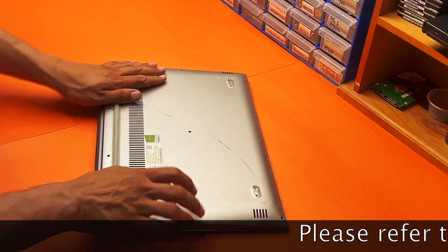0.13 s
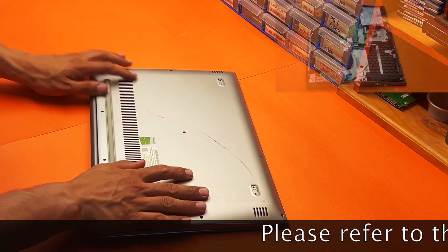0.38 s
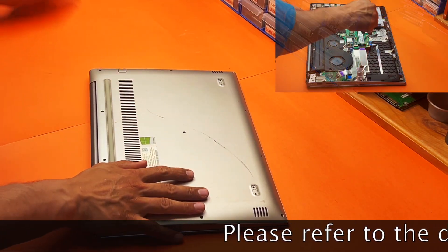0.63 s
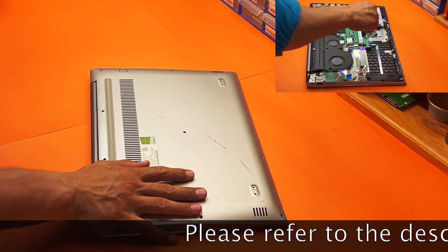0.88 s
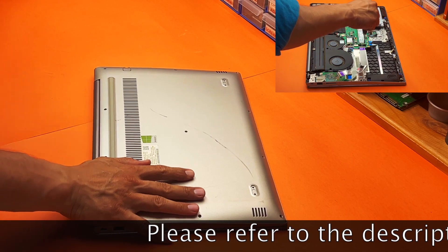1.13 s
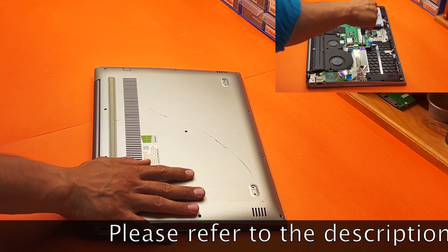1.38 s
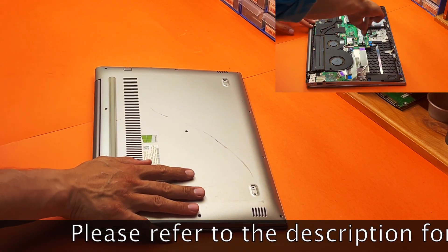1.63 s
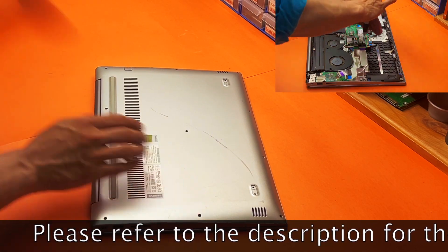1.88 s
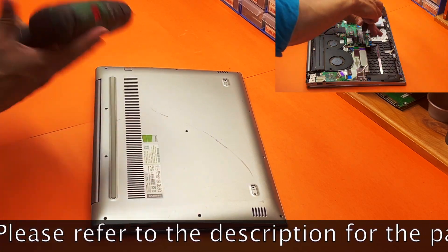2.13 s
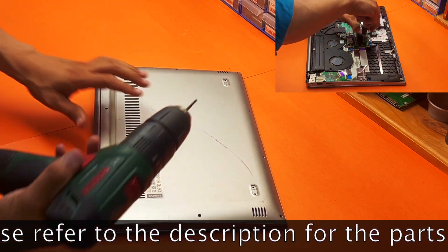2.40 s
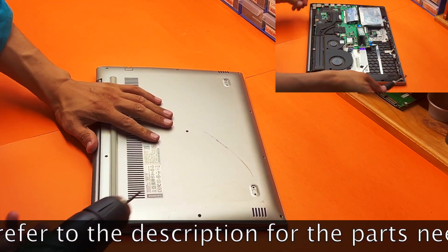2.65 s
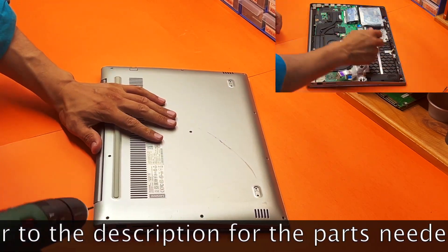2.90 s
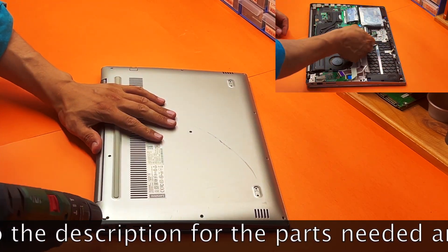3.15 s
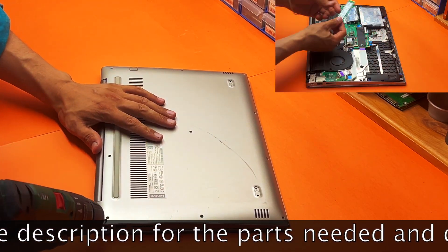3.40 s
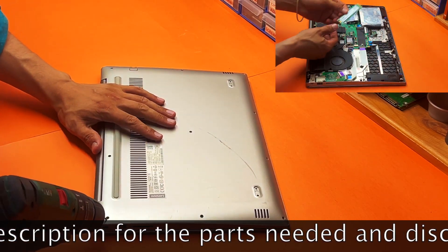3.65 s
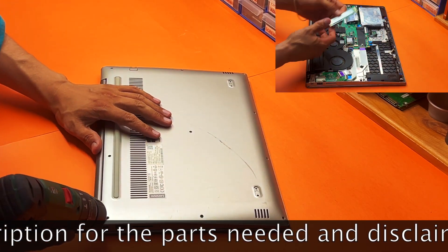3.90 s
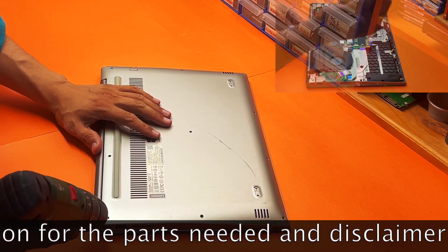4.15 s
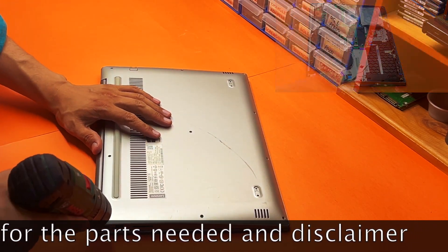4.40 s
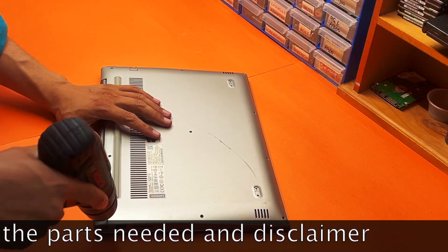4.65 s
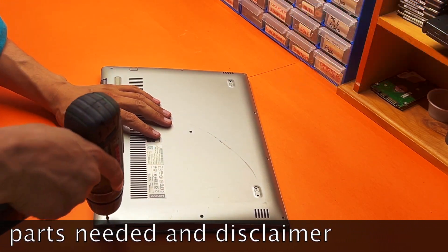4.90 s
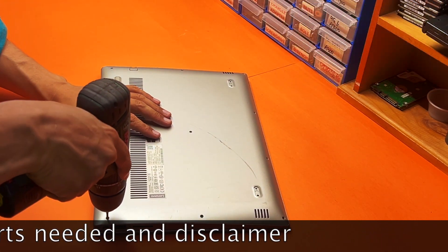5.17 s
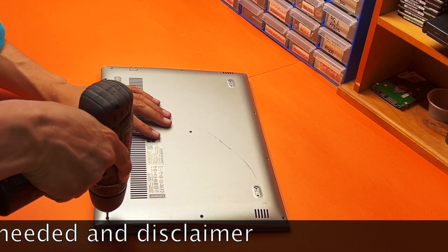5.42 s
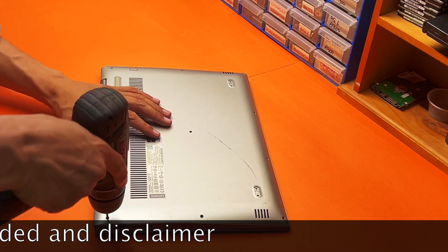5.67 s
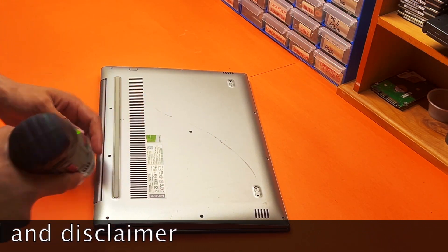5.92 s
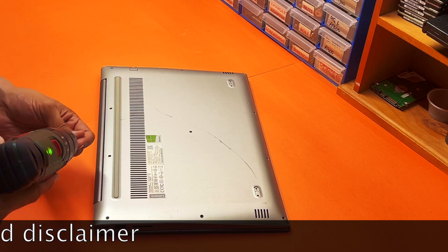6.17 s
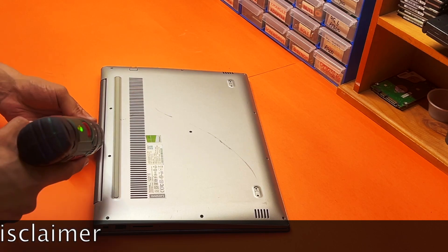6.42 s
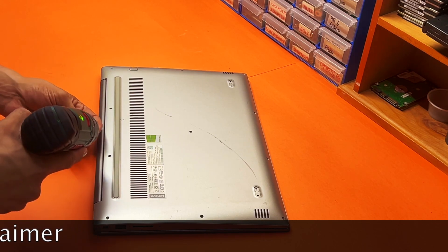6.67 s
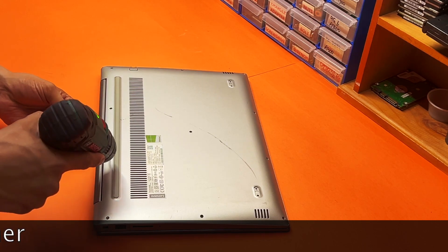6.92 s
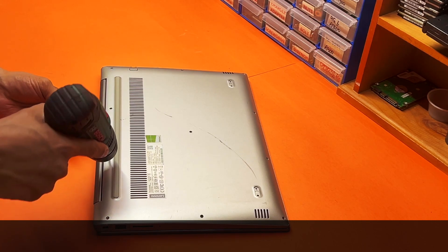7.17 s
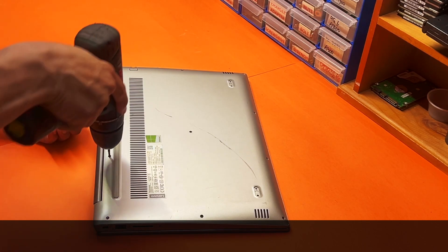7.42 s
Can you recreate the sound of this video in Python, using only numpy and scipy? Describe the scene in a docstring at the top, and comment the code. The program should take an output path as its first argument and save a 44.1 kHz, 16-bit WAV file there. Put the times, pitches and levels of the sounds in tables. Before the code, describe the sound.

A quiet workshop with faint low ventilation hush and a short room reverberation, heard close. At 0-0.6 s a hand brushes the laptop cover with a raspy hiss, and a soft thump lands at 0.3. Light ticks follow, then a busier group of taps and bench knocks from 1.2 to 1.6. Crisp small clicks cluster around 2.1, with faint sliding up to 2.8. Dull thuds fall at 3.2, softly at 3.8, and at 4.6, between quiet gaps. Clicks and a heavier knock at 4.8-5.0 lead into the cordless screwdriver: a gritty whirr climbing in pitch, with fast weakening jolts through the bench near 5.4, then steady whine until 5.7. It drops sharply and brakes with two loud, dry clacks at 5.73 and 5.75. Only faint rubs and ticks remain until a soft knock at 7.0, clicks at 7.3, and a new motor spin-up from 7.4, cut off at 7.55.

```python
"""Cordless screwdriver on a workshop bench

In a quiet workshop hands slide and tap on a laptop cover lying on a bench: shaped friction noise and short
damped modes. A cordless screwdriver spins up, its shaft phase driving brush hiss, a comb of orders and whine.
Its blows and shake excite the modes of the bench, and two sharp brake clacks ring the gearbox as it stops.
It starts once more at the end. Room tone lies beneath, and a reverberant tail follows the near sources."""
import sys
import numpy as np
from scipy import signal
from scipy.fft import rfft, irfft, next_fast_len
from scipy.io import wavfile
from scipy.ndimage import uniform_filter1d

SR = 44100
rng = np.random.default_rng(int(sys.argv[2]) if len(sys.argv) > 2 else 0)


def materialize(psi):
    """Save the field psi as 16-bit PCM at rate SR to the path in sys.argv[1].

    A 1-D psi becomes a single channel; in a 2-D psi each row is a channel.
    """
    bounded = np.clip(np.atleast_2d(psi).T, -1, 1)
    quanta = np.round(bounded * 32767).astype(np.int16)
    wavfile.write(sys.argv[1], SR, quanta)


def volts(x):
    """Linear amplitude factor 10**(x/20) for a level x in dB, scalar or array-like."""
    e = np.asarray(x, float) / 20
    return 10 ** e


N = 332955
T = np.arange(N) / SR


def evened(x):
    """Normalisation: scales to rms 1."""
    return x / np.sqrt(np.mean(x ** 2) + 1e-20)


def read(points, hz):
    """Interpolation of a spectrum table on a logarithmic frequency axis."""
    f, value = np.transpose(points)
    return np.interp(np.log(hz + 1), np.log(f + 1), value)


def colour(x, points):
    """Linear filtering: multiplies the spectrum by a (frequency [Hz], gain [dB]) table."""
    size = next_fast_len(x.shape[-1] + 4096)
    gain = volts(read(points, np.fft.rfftfreq(size, 1 / SR)))
    return irfft(rfft(x, size) * gain, size)[..., :x.shape[-1]]


def add(mix, s, sound):
    """Superposition: adds a sound into the mix at time s."""
    part = mix[round(s * SR):][:len(sound)]
    part += sound[:len(part)]


def unpack(rows):
    """Interpolation of a curve table: start time, edge fade and sample-rate columns."""
    s, *columns = np.transpose(rows)
    t = np.arange(s[0], s[-1], 1 / SR)
    fade = np.clip(np.minimum(t - s[0], s[-1] - t) / 0.009, 0, 1)
    return s[0], fade, [np.interp(t, s, c) for c in columns]


def stretch(s, seconds):
    """Linear progress 0-1 through a span, with its edge fade."""
    _, fade, (u,) = unpack([(s, 0), (s + seconds, 1)])
    return fade, u


def wander(n, width):
    """Smoothed noise: random drift of rms 1, averaged twice over width samples."""
    return evened(uniform_filter1d(uniform_filter1d(rng.standard_normal(n), width), width))


def ring(x, hz, t60):
    """Modal resonance: convolves x with a decaying sine."""
    t = np.arange(int(t60 * SR) + 8) / SR
    return signal.oaconvolve(x, np.sin(2 * np.pi * hz * t) * volts(-60 * t / t60))[:len(x)]


def contact(n, seconds):
    """Impact force: swift rise, peak after the given time (0.2 ms at least), fast fall."""
    u = np.arange(n) / SR / max(seconds, .0002)
    return u * np.exp(1 - u)


# spectrum of the ventilation hush: (frequency [Hz], level [dB])
AIR = [(15, -49), (25, -6), (59, 1.5), (102, -7), (137, -7.5), (206, -16.5), (249, -11.5), (624, -28.5),
       (1610, -30), (3720, -50.5), (10700, -68), (14400, -46.5), (16000, -72.5)]
AIR_DB = -54.5
# building rumble: (time [s], level [dB])
RUMBLE = [(0.0, -49), (0.4, -60.5), (0.95, -51.5), (1.6, -54), (1.9, -67.5), (7.55, -68)]
# far midrange drone that comes up late: (time [s], level [dB])
DRONE = [(0, -79), (5.6, -75), (6.2, -68.5), (7.55, -68)]
# spectrum of the drone: (frequency [Hz], level [dB])
DRONE_BAND = [(300, -29.5), (550, -2.5), (800, -3.5), (1100, -4.5), (2000, -38)]
# faint thin supply whine: (frequency [Hz], level [dB])
SUPPLY_WHINE = (14040, -95)


def room_tone():
    """Stationary background noise: filtered hush, varying rumble, a far drone and a faint pure tone."""
    hush = volts(AIR_DB + 0.27 * wander(N, 3000)) * evened(colour(rng.standard_normal(N), AIR))
    low_band = [(30, -25.5), (48, 12), (70, -3.5), (130, -16.5), (300, -44.5)]
    low = evened(colour(rng.standard_normal(N), low_band))
    rumble = volts(np.interp(T, *np.transpose(RUMBLE))) * low
    drone = volts(np.interp(T, *np.transpose(DRONE))) * evened(colour(rng.standard_normal(N), DRONE_BAND))
    hz, db = SUPPLY_WHINE
    whine = volts(db + 3 * wander(N, 300)) * np.sin(2 * np.pi * hz * T)
    return hush + rumble + drone + whine


# reverberation time of the room: (frequency [Hz], t60 [s])
ROOM = [(250, 0.4), (1000, 0.41), (4000, 0.43), (8000, 0.42), (14000, 0.21)]


def reverb(x, count):
    """Diffuse reverberation: sparse taps of random sign, each band dying at its own rate."""
    taps = np.zeros((count, SR // 2))
    taps[:, 150:] = rng.choice([-1., 0, 0, 0, 0, 0, 0, 1.], (count, SR // 2 - 150))
    hz, t, z = signal.stft(taps, SR, nperseg=256)
    decay = volts(-60 * t / read(ROOM, hz)[:, None])
    tail = signal.istft(z * decay, SR, nperseg=256)[1]
    return signal.fftconvolve(x[None], tail / np.linalg.norm(tail[0]), axes=1)[:, :N]


# the bit jolts the bench once a turn of the chuck, weaker as the screw comes loose
JOLT_S, CHUCK_TURN_S, JOLT_CONTACT_S = 5.373, .069, 0.0055
JOLT_DB, JOLT_STEP_DB = -19.5, -4.5


def jolts(count):
    """Periodic impact: blows of the turning bit, as rows like the thumps."""
    return [(JOLT_S + k * CHUCK_TURN_S, JOLT_DB + k * JOLT_STEP_DB, JOLT_CONTACT_S) for k in range(count)]


# palm and tool landing on the bench: (time [s], peak [dB], contact [s])
THUMPS = [(0.281, -32, 0.00067), (1.215, -32, 0.004), (1.491, -22.5, 0.00085), (1.512, -39, 0.0015),
          (1.552, -35, 0.0031), (1.566, -33.5, 0.0018), (2.53, -38, 0.01), (3.219, -29.5, 0.0013),
          (3.259, -30.5, 0.0012), (3.806, -36, 0.0028), (4.628, -30, 0.0022), (5.008, -22.5, 0.0065),
          (6.99, -33, 0.004)]
# modes of the bench: (frequency [Hz], level [dB], t60 [s])
BENCH = [(80, -9.5, 0.13), (102.8, 0, 0.19), (131, -2, 0.19), (149, -14.5, 0.058), (206.5, -3.5, 0.14),
         (273, -1.5, 0.11), (322, -5.5, 0.049), (378.4, 0.5, 0.051), (439, -3, .05), (597, -6, 0.035),
         (796, -8, 0.031), (1062, -8.5, .02)]
# bench shaken through the bit while it bites; the level moves by SHAKE_FALL_DB over the span
SHAKE_S, SHAKE_LENGTH_S, SHAKE_DB, SHAKE_FALL_DB = 5.37, 0.3, -38, -7.5


def bench():
    """Modal excitation: blows, brighter when contact is short, and the tool's shake drive the bench modes."""
    out = np.zeros(N)
    n = SR // 3
    for s, db, seconds in THUMPS + jolts(count=5):
        settle = rng.standard_normal(n) * contact(n, 0.016)  # the loose cover chatters as it beds down
        push = contact(n, seconds / 4) + .35 * settle
        blow = sum(volts(d + 1.5 * rng.standard_normal()) * ring(push, f * rng.uniform(0.97, 1.03), t60)
                   for f, d, t60 in BENCH)
        add(out, s, volts(db) * blow / abs(blow).max())
    fade, u = stretch(SHAKE_S, SHAKE_LENGTH_S)
    shake = colour(rng.standard_normal(len(fade)), [(110, -2.5), (250, -5), (800, -30.0)])
    shaken = evened(sum(volts(d) * ring(shake, f, t60) for f, d, t60 in BENCH))
    add(out, SHAKE_S, fade * volts(SHAKE_DB + SHAKE_FALL_DB * u) * shaken)
    return colour(out, [(40, -29), (75, -3.5), (100, 1.5)])  # the bench is too small to radiate deep bass


# skin and tool sliding on the cover:
# (loudest at [s], rise [s], fall [s], rasp [dB], hiss over the rasp [dB])
RUBS = [(.162, .08, 0.27, -52, 5), (0.484, 0.16, 0.14, -63, 15), (.95, 0.23, 0.73, -71.5, 5),
        (1.166, .3, 0.43, -66.5, 0), (1.644, 0.25, 0.63, -77, 5.5), (2.15, 0.087, 0.26, -73, 8),
        (2.454, .3, 0.37, -74.5, 3), (2.668, .05, .2, -63, 2), (2.768, 0.17, 0.061, -57.5, 5.5),
        (3.81, 0.055, .1, -81, 6), (6.149, .2, 0.23, -73, -9), (6.72, .03, 0.4, -79.5, 8)]
# spectrum of the friction noise: (frequency [Hz], level [dB])
RUB = [(500, -5), (1200, -5.5), (2500, -6), (3700, -3), (5000, -10), (8300, -8.5), (11500, -15.5),
       (14000, -9), (16000, -8)]
RUB_ENDS_DB = -30  # a stroke swells from and sinks to this level relative to its peak


def rub(top, rise, fall, rasp_db, hiss_db):
    """Sliding friction: dense uneven grains with sparse catches, duller or brighter with what slides."""
    s, fade, (db,) = unpack([(top - rise, RUB_ENDS_DB), (top, 0), (top + fall, RUB_ENDS_DB)])
    n = len(fade)
    catches = 1 + .7 * uniform_filter1d((rng.random(n) < 40 / SR) * 60., 60)  # about 40 a second
    full = colour(rng.standard_normal(n) * volts(2.7 * wander(n, 60)) * catches, RUB)
    high = colour(full, [(3800, -21.0), (5600, 0.0)])
    return s, fade * volts(rasp_db + db) * (evened(full - high) + volts(hiss_db) * evened(high))


# fingers busy with small parts: (from [s], to [s])
FIDGET = [(.78, 1.2), (2.25, 2.6), (6.1, 6.3)]
FIDGET_DB, FIDGET_SPREAD_DB = -61, 3


def fidget(count):
    """Random point process: faint taps in each busy span, as rows like the ticks."""
    return [(a + (b - a) * u, FIDGET_DB + FIDGET_SPREAD_DB * (2 * v - 1), 1500 + 2000 * w, 5 - 15 * x)
            for a, b in FIDGET for u, v, w, x in rng.random((count, 4))]


# taps of nails, bit, screws and trigger:
# (time [s], peak of the low ring [dB], low ring [Hz], high ring over low [dB])
TICKS = [(0.018, -61, 3630, 18.5), (0.0449, -52.5, 3630, 15.5), (0.2763, -36, 1440, -14),
         (0.805, -57.5, 2500, -1.5), (0.8827, -56.5, 3500, 1), (0.9103, -53.5, 2680, -7),
         (1.0304, -53.5, 1640, 5), (1.232, -33.5, 2130, -10.5), (1.3047, -42, 2620, -2),
         (1.3298, -42.5, 2600, 2.5), (1.376, -37.5, 1930, 2), (1.4877, -37.5, 1850, -7.5),
         (1.7641, -51.5, 1900, -3.5), (2.0534, -45, 2580, -4.5), (2.0839, -49, 1920, -3),
         (2.0945, -46, 2960, -1), (2.1086, -37, 1570, -2), (2.119, -28.5, 2020, 3),
         (2.1533, -31, 3170, -2.5), (2.355, -64.5, 1510, 12), (2.4196, -55, 2020, -6),
         (2.5082, -50, 1980, -19), (2.6517, -54, 2500, 4.5), (2.761, -53, 4400, 4),
         (3.213, -47.5, 1766, -12.5), (3.813, -52, 1540, -18), (4.626, -37.5, 1630, -21),
         (4.784, -51.5, 1520, -16), (4.8525, -42, 1750, 4), (4.946, -34.5, 2130, -8),
         (5.367, -25.5, 2506, -2), (5.4345, -26.5, 2439, 3), (6.1676, -55, 3860, -20),
         (6.2641, -63, 3830, -24), (6.6258, -53.5, 3740, -27), (6.9825, -36.5, 1628, -15.5),
         (7.3051, -55.5, 1602, 14), (7.339, -42, 2278, 4.5)]
# high modes of small hard parts: (frequency [Hz], level [dB])
HIGH_RING = [(5500, -11), (6400, -4), (7300, 11.5), (8400, 5.5), (12500, -14), (14500, -8)]


def tick(db, hz, high_db):
    """Impact of small parts: a contact rings low and high groups of short modes, with a weaker rattling tail."""
    t = np.arange(int(.09 * SR)) / SR
    force = contact(len(t), 0.00091) + 0.516 * volts(-60 * t / 0.074)
    rattle = rng.standard_normal((2, len(t))) * force
    spread = [(.6, .25), (.8, .5), (1, 1), (1.2, .6), (1.5, .2)]  # (multiple of the low ring, gain)
    low = sum(g * ring(rattle[0], hz * r * rng.uniform(.94, 1.06), .005) for r, g in spread)
    high = sum(volts(d) * ring(rattle[1], f * rng.uniform(.94, 1.06), .0025) for f, d in HIGH_RING)
    return volts(db) * (low / abs(low).max() + volts(high_db) * high / abs(high).max())


# the slower gear stage growls upward as it takes up speed:
# (start [s], length [s], from [Hz], to [Hz], level [dB])
GROWL = [(5.05, .28, 350, 660, -51), (7.44, .11, 330, 590, -50)]
# harmonics of the growl: (multiple, level [dB])
GROWL_ORDERS = [(1, -1.5), (2, -12.5), (3, -4.5), (4, -5.5), (5, -9.5), (7, -5), (9, -12)]
GROWL_BEND = .75  # below 1 the climb is quick at first


def growl(s, seconds, from_hz, to_hz, db):
    """Harmonic synthesis: a wavering low gear tone with fuzzy overtones."""
    fade, u = stretch(s, seconds)
    n = len(u)
    hz = from_hz + (to_hz - from_hz) * u ** GROWL_BEND
    turns = np.cumsum(hz * (1 + .015 * wander(n, 200))) / SR
    tones = sum(volts(d + 4 * wander(n, 700)) * np.sin(2 * np.pi * k * turns) for k, d in GROWL_ORDERS)
    return s, fade * volts(db) * tones


# one table a trigger pull: (time [s], whirr [dB], mean motor shaft rate [Hz])
SPIN = [
    [(4.95, -55.5, 160.6), (5.054, -41.5, 204.9), (5.13, -38, 220.4), (5.29, -35, 252.8),
     (5.388, -31.5, 278.2), (5.596, -32.5, 281.5), (5.706, -33, 250), (5.74, -27.5, 187.5)],
    [(7.37, -64, 151.9), (7.4, -51, 171.9), (7.468, -43.5, 211), (7.55, -37.5, 228.4)],
]
# whirr through the plastic shell: (frequency [Hz], gain [dB])
HOUSING = [(250, -17), (600, -17), (750, -21), (1250, -17.5), (2560, -15), (3300, -14.5), (4460, -20.5),
           (5660, -13), (6260, -13.5), (6940, -5.5), (8310, -12), (9000, -15.5), (11500, -18.5),
           (13000, -13), (14600, -10), (16000, -19.5)]
# the shell groans at low speed: (frequency [Hz], gain [dB]); STRAIN_DB is relative to the whirr
STRAIN = [(800, -24), (1300, -7.5), (1650, 0), (2050, -0.5), (2600, -20)]
STRAIN_DB = -8
# low shaft tones at full speed: (multiple of the shaft, level [dB])
UNBALANCE = [(1, -52.5), (2, -52), (3, -58)]
TEETH = range(10, 36)  # gear and commutator lines above the pinion's, as multiples of the shaft
PINION_TEETH, FULL_SPEED_HZ = 9, 281.7
WHINE_DB = -46  # pinion whine at full speed
BRAKE_SQUEAL_DB = -36  # the pinion sings when the shaft loses 1500 Hz a second


def motor(rows):
    """Order synthesis: shaft phase drives pulsed brush hiss, a comb of lines, low tones and pinion whine."""
    s, fade, (whirr_db, shaft_hz) = unpack(rows)
    n = len(fade)
    turns = np.cumsum(shaft_hz * (1 + .003 * wander(n, 200))) / SR
    speed = shaft_hz / FULL_SPEED_HZ
    # the hiss pulses once a turn and, more weakly, with the planet gears
    throb = (1 + 0.43 * np.cos(2 * np.pi * turns)) * (1 + 0.12 * np.cos(2 * np.pi * 0.34 * turns))
    brush = rng.standard_normal(n) * throb * volts(0.25 * wander(n, 60))
    hiss = evened(colour(brush, HOUSING))
    orders = sum(volts(5.8 * wander(n, 1500)) * np.cos(2 * np.pi * (k * turns + rng.random())) for k in TEETH)
    # the lines rise out of the hiss with speed
    whirr = hiss + .55 * evened(colour(orders, HOUSING)) * speed ** 0.53
    groan = evened(colour(rng.standard_normal(n) * throb, STRAIN))
    groan = groan * volts(STRAIN_DB + 3 * wander(n, 500)) * np.clip(3 * (1 - speed), 0, 1)
    braking = np.clip(-np.gradient(shaft_hz) * SR / 1500, 0, 1) ** 2
    whine_gain = speed ** 6 * volts(WHINE_DB + 2.5 * wander(n, 500)) + braking * volts(BRAKE_SQUEAL_DB)
    whine = whine_gain * np.sin(2 * np.pi * PINION_TEETH * turns)
    low = sum(volts(db + 3 * wander(n, 800)) * np.sin(2 * np.pi * k * turns) for k, db in UNBALANCE)
    return s, fade * (volts(whirr_db) * (whirr + groan) + whine + speed ** 8 * low)


# the brake catches, chatters and catches again:
# (time [s], peak [dB], lift of the modes above 6 kHz [dB], contact [s])
BRAKE = [(5.7300, -1.5, -7.5, 0.0013), (5.7340, -15, -9, 0.0008), (5.7365, -24, -6.5, 0.0016),
         (5.7545, 0, 0.5, 0.00032), (5.757, -15.5, -3.5, 0.00062), (5.761, -19, -8.5, .001)]
# modes of the gearbox: (frequency [Hz], level [dB], t60 [s])
GEARBOX = [(508.4, -24, 0.01), (1130, -9.5, 0.0054), (1782, -14, .006), (2903, -12, .004),
           (3290, 1, 0.0039), (4017, -1.5, 0.0031), (5200, -10.5, 0.0034), (7420, -11, .004),
           (8870, 5.5, 0.0028), (13200, -17.5, .003)]


def clack(db, high_db, seconds):
    """Modal synthesis: the brake's blow swells each gearbox mode over the contact time."""
    t = np.arange(2000) / SR
    rings = [volts(d + high_db * (f > 6000) - 60 * t / t60)
             * np.sin(2 * np.pi * (f * rng.uniform(0.92, 1.03) * t + rng.random()))
             for f, d, t60 in GEARBOX]
    blow = sum(rings) * np.minimum(t / max(seconds, .0002), 1) ** 2
    return volts(db) * blow / abs(blow).max()


# stereo width: (frequency [Hz], gain of the side signal [dB])
SIDE_DB = [(60, -23), (150, -12), (300, -12), (640, -3.5), (1200, -2.5), (2500, -15), (4500, -13.5),
           (7500, -32.5), (9000, 17.5), (13000, 0)]


def scene():
    """Mid-side superposition: near sources, room tail and tone; the side holds a scattered copy and own tone."""
    near, brake = bench(), np.zeros(N)
    for s, *row in TICKS + fidget(count=2):
        add(near, s, tick(*row))
    for row in RUBS:
        add(near, *rub(*row))
    for row in GROWL:
        add(near, *growl(*row))
    for rows in SPIN:
        add(near, *motor(rows))
    for s, *row in BRAKE:
        add(brake, s, clack(*row))
    # the brake clacks are heard drier, with less room tail than the other sounds
    reverb_send = near + .25 * brake
    mid = near + brake + volts(-7) * reverb(reverb_send, count=1)[0] + room_tone()
    scatter = rng.standard_normal(4000) * volts(-60 * np.arange(4000) / (.08 * SR))
    scattered = signal.oaconvolve(near + brake, scatter / np.linalg.norm(scatter))[:N]
    side = colour(0.51 * scattered + room_tone(), SIDE_DB) - 0.032 * mid
    return np.array([mid + side, mid - side])


def band_limit(x):
    """A steep low-pass at the top of the band."""
    return signal.sosfilt(signal.butter(12, 16460, fs=SR, output="sos"), x)


# microphone response, with a deep dip near 11 kHz: (frequency [Hz], gain [dB])
MIC = [(20, -20.5), (45, -1.5), (8800, 2.5), (9500, -18), (10900, -42.5), (11400, -2), (15700, -2.5),
       (16300, -65)]


def record(dry):
    """Transduction: microphone colour, then soft saturation on the loudest peaks."""
    heard = colour(dry, MIC)
    mix = 1.105 * np.tanh(heard / 1.057)
    return band_limit(mix)


dry = scene()
out = record(dry)
materialize(out)
```